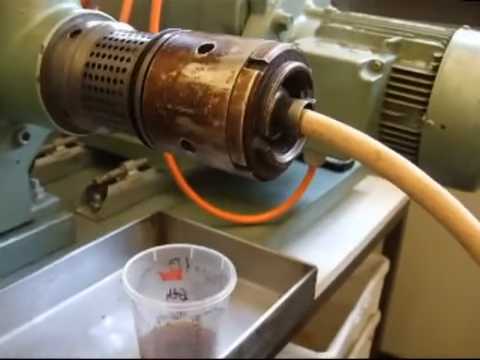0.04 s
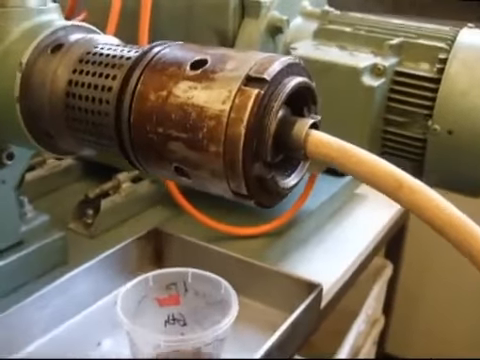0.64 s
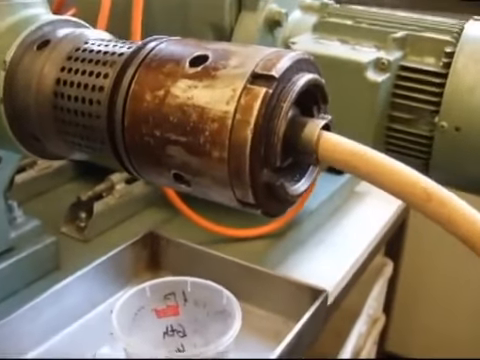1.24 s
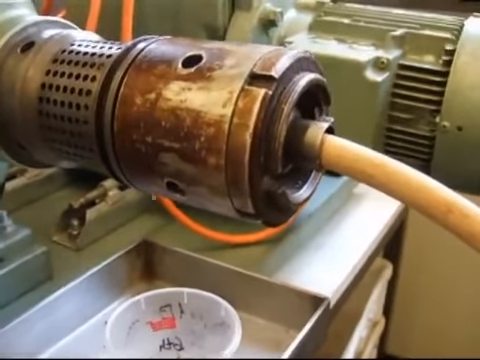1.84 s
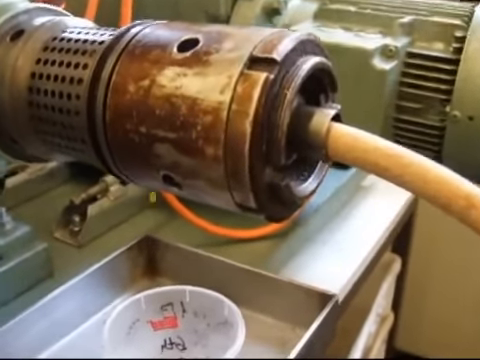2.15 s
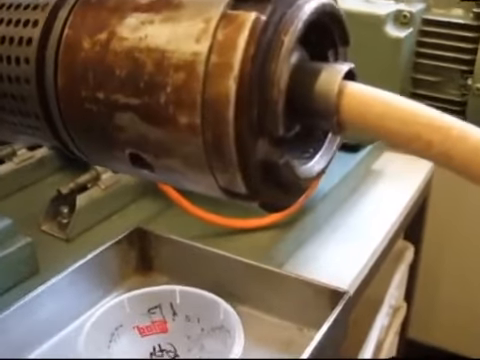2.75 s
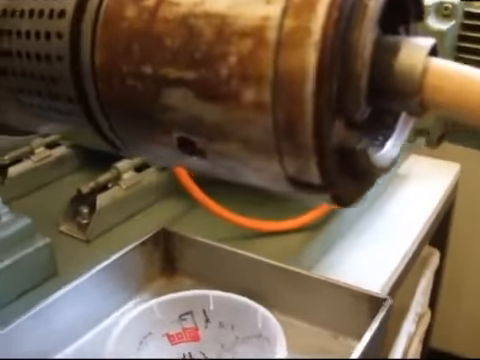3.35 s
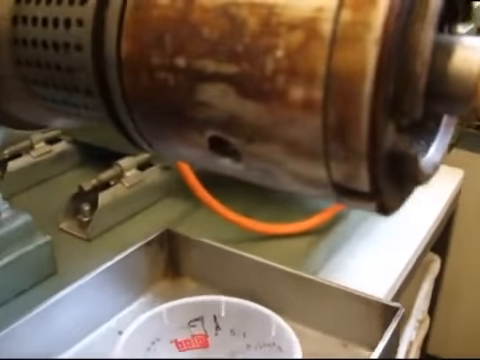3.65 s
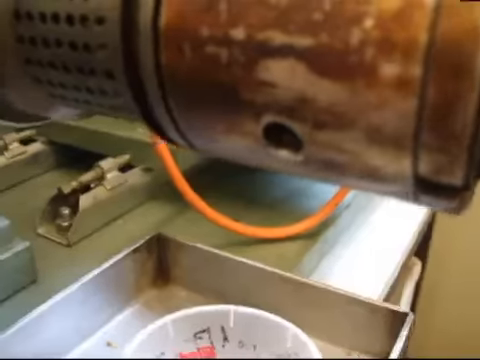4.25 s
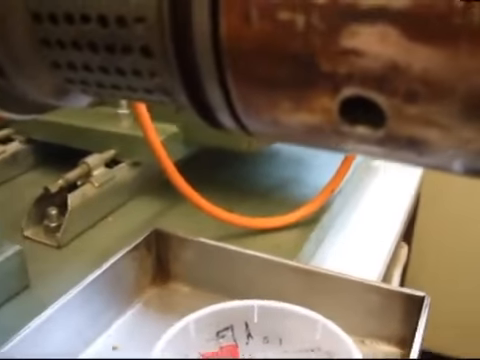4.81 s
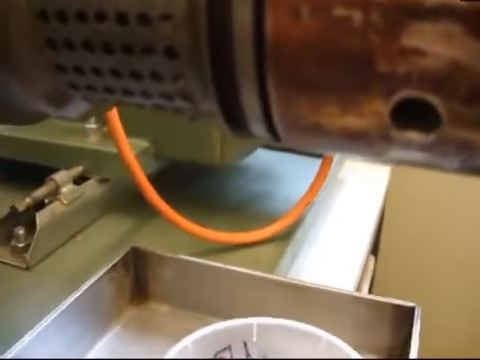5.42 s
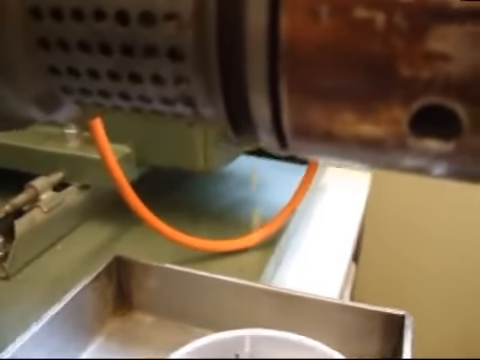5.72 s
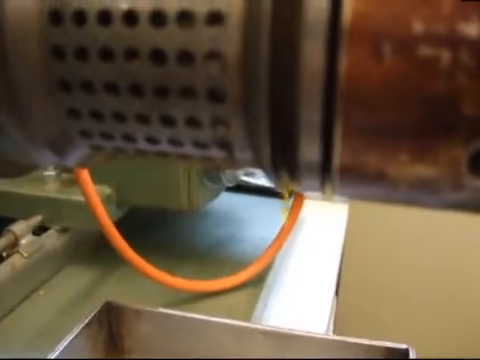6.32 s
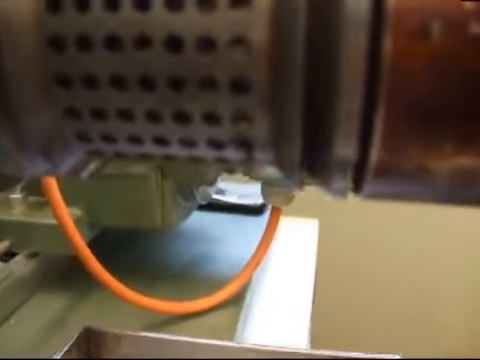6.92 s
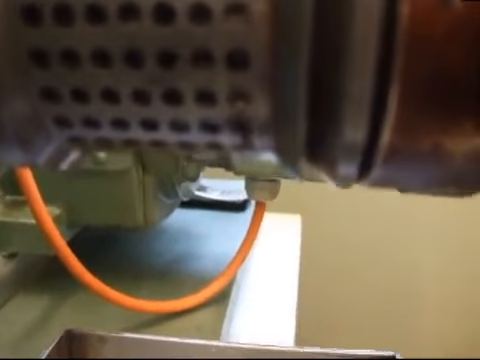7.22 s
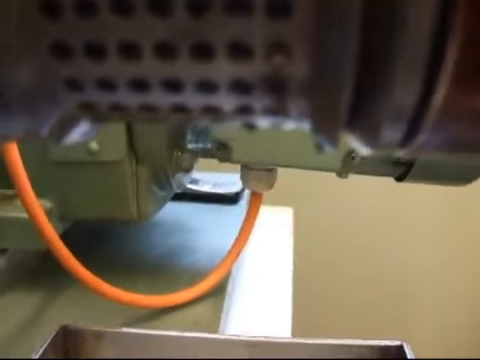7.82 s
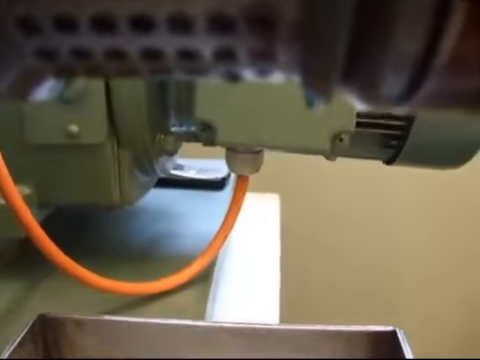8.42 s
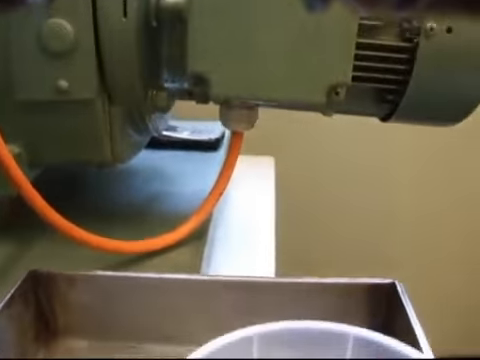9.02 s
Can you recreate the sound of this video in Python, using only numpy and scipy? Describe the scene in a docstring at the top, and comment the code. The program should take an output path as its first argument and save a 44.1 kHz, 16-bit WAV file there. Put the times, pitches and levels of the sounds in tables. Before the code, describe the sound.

An electric motor and gearbox drone steadily indoors, driving an oil press. A many-toned whine and the airy, slightly buzzing rush of a fan sit above the hum. The pitch holds throughout, while the sound gradually gets fuller and louder as the close microphone approaches. The metal press head ticks faintly around the middle and again near the end.

```python
"""A screw oil press runs steadily in a workshop while the microphone moves slowly towards its drive.
The induction motor hums and whines at its rotor-slot harmonics, the gearbox drones and rattles in its casing,
the cooling fan rushes and rings the motor housing, and the press head gives a few faint ticks."""
import sys
import numpy as np
from scipy import signal
from scipy.fft import rfft, irfft, next_fast_len
from scipy.io import wavfile

SR = 44100
rng = np.random.default_rng(int(sys.argv[2]) if len(sys.argv) > 2 else 0)


def put_to_file(sound):
    """Save the sound as 16-bit audio at rate SR, in the file named by the first command-line argument."""
    columns = np.atleast_2d(sound).T  # one column per channel
    safe = np.clip(columns, -1, 1)
    whole_steps = np.round(safe * 32767)
    wavfile.write(sys.argv[1], SR, whole_steps.astype(np.int16))


N = 403956

# steadier magnetic tones: (multiple of rotor speed, multiple of mains, dB at the start, rise dB)
MOTOR_TONES = [(0, 12, -39, 1), (42, 0, -50, -5), (52, 0, -47.5, -6), (55, 0, -62, 12), (73, 0, -53, 1), (80, 0, -54.5, 9),   # fixed
               (84, 0, -56, 5), (94, 0, -64, 9), (107, 0, -61, 4), (109, 0, -62, 6), (112, -2, -59, 7), (112, 0, -58, 8),   # fixed
               (133, 0, -54, -1), (137, 0, -55, 0), (140, -2, -55, 0), (147, 2, -55, 0), (148, 0, -58, 5),   # fixed
               (154, 0, -59, 6), (168, -2, -57, -6), (168, 2, -59, -5), (189, 0, -65, 14), (196, 4, -57, 0),   # fixed
               (203, 0, -60, 0), (224, 2, -58, 1), (251, 0, -57, 1), (284, 0, -59, 2), (308, -2, -62, 2), (308, 0, -63, 6)]   # fixed
# shaft tones: (multiple of rotor speed, dB)
SHAFT = [(6, -50.5), (7, -51.5), (11, -58), (16, -52.5), (17, -46.5), (18, -43), (25, -51.5), (27, -54.5), (30, -47.5), (44, -56.5)]
# gear drone: (multiple of gear rate, dB)
GEAR = [(7, -51.5), (8, -51), (9, -63.5), (12, -53), (14, -48.5), (15, -33.5), (16, -35.5), (17, -45.5), (18, -55), (20, -36.5), (21, -41.5),
        (22, -34.5), (23, -39), (24, -47.5), (25, -46), (26, -45.5), (27, -45), (28, -39.5), (29, -48.5), (30, -44), (31, -49.5)]
# further steady tones of the drive: (Hz, dB)
DRIVE_TONES = [(489.5, -48.5), (657.2, -47), (706.7, -47), (850.5, -43)]   # fixed
# the gear tones barely waver: (spread dB)
GEAR_WAVER_DB = 1.4   # fixed
# strength of the once-a-revolution buzz against the random air noise
WHIRR_BUZZ, HISS_BUZZ = 0.42, 0.56   # fixed
# bearing tones: (multiple of ball-pass rate, dB)
BEARING = [(2, -40), (3, -43)]
# hum: (multiple of mains, dB)
HUM = [(2, -37.5), (6, -1.0)]
# gearbox casing: (Hz, width Hz, dB)
CASING = [(299, 41, -0.5), (376, 76, -2.5), (457, 69, -6.5), (675.3, 65, 3.0), (741, 17, -6.5), (891.6, 77, 2), (1030.5, 27, -9.5)]
# fan rush and high hiss: (Hz, dB per Hz)
FAN = [(200, -21.5), (600, -7.5), (1000, 0), (1130, 0), (1350, -1.5), (1600, -11), (3000, -32)]
HISS = [(3000, -24.5), (4600, -2.5), (5400, -0.5), (5850, -1.5), (6500, -2), (7500, 0.5), (7900, -23)]
# ringing of the motor housing: (Hz, width Hz, loudest at s, heard for s either side, dB)
HOUSING = [(1056, 70, 8.9, 1.3, -42), (1276, 220, 4.4, 0.72, -43), (1530, 200, 1.4, 1.9, -46.5), (1819, 110, 2.8, 1.3, -44.5),
           (2524, 110, 2.3, 2.2, -51), (2740, 130, 7.7, 1.2, -51), (3270, 90, 4.55, 0.44, -44.5)]
# ticks at the press head: (s, bright ring dB, dull crack dB)
TICKS = [(4.679, -31, -28), (5.413, -30, -31), (5.691, -31, -40), (8.651, -36, -24.5), (8.728, -22, -40)]   # fixed
# the dull crack: (Hz, dB per Hz)
CRACK = [(900, -12), (1500, -2), (2100, 0), (2700, -5), (4000, -13), (7500, -22)]   # fixed
# press head: (Hz, dB, t60 s)
HEAD = [(2900, -12, .012), (5300, -13, .012), (6750, -12, .01), (7100, -2, .012), (7400, -3, .025)]   # fixed
CUTOFF_HZ = 7650   # fixed
TIME = np.arange(N) / SR
SLOTS = 28   # fixed
ROTOR_HZ, GEAR_HZ, MAINS_HZ, BEARING_HZ = 24.677, 30.99, 49.96, 147.05   # fixed
# broad noises of the drive: (Hz, dB per Hz)
RUMBLE = [(20, 0), (40, -11.5), (70, -12.5), (100, -8), (160, -2.5), (230, -4), (330, 4.5), (560, -3), (900, -20), (2000, -42)]
WHIRR = [(900, -12), (1500, 1.5), (1850, 2), (2150, -1), (2700, -0.5), (3000, -4), (3700, -1.5), (4100, -3.5), (4700, -10.5), (6500, -21.5)]
# bed, motor frame and low, middle and high casing panels; each swells as the microphone comes round to it:
# (Hz where it radiates most, swell from s, swell until s, rise dB)
PANELS = [(180, -2, 5.5, 4), (320, 1.5, 8.2, 10), (450, -1.5, 7.5, 4.5), (640, -2, 4, 10), (865, 4.5, 5.5, 2.5)]
# steady sounds gain evenly over the approach: (dB at the start, rise dB)
RUMBLE_LEVEL = (-40.5, 5)
WHIRR_LEVEL = (-37.5, 1.92)
HISS_LEVEL = (-43.5, 1.3)
# level of the hum, which rises steadily over the approach: (s, dB)
HUM_LEVEL = [(0.0, -39.5), (3.0, -33.5), (6.2, -26.5), (9.14, -22.5)]
# level of the fan's rush: (s, dB)
RUSH_LEVEL = [(0.3, -40.5), (2.27, -40.5), (4.64, -39), (5.44, -40), (9.05, -39.5)]
# standing waves make each tone swell and fade: (spread dB per kHz of pitch, swings per s)
STANDING_DB, STANDING_PER_S = 2, 0.94
# the moving microphone shifts the phase of each tone: (spread radians per kHz of pitch, swings per s)
PATH_RAD_PER_KHZ, PATH_PER_S = 0.15, 0.3   # fixed
# level of the numbered slot harmonics and their strongest neighbours along the path through the room's standing waves: (s, dB)
WHINE_1 = [(0.0, -39), (3.27, -31), (9.14, -37)]
WHINE_1_UPPER = [(0.0, -37.5), (1.43, -43), (2.2, -39), (2.78, -32.5), (3.8, -33.5), (4.57, -42),
                 (5.76, -34.5), (7.55, -29.5), (9.14, -29)]
WHINE_1_TOP = [(0.0, -46), (1.31, -38.5), (2.12, -35), (2.78, -46), (4.37, -43.5), (5.63, -31),
               (9.14, -30.5)]
WHINE_5_FLUTTER = [(0.0, -48), (2.45, -56), (2.7, -42), (3.05, -48), (3.35, -55), (3.59, -32.5), (4.12, -42.5), (4.65, -38.5),
                   (5.3, -44.5), (5.8, -53), (7.5, -46), (9.14, -50)]
WHINE_5_UPPER = [(0.0, -48), (1.1, -39.5), (2.29, -48.5), (2.65, -38.5), (3.92, -50.5), (4.9, -37.5),
                 (5.51, -60), (6.73, -43), (8.16, -37.5), (9.14, -45)]
WHINE_5_TOP = [(0.0, -50), (0.33, -42), (1.59, -47), (2.04, -42), (4.69, -41), (5.51, -44.5),
               (6.73, -42.5), (7.1, -46), (9.14, -36.5)]
WHINE_6 = [(0.0, -55), (0.33, -43), (0.65, -53), (1.92, -44.5), (2.45, -51.5), (2.86, -45), (3.8, -52),
           (6.57, -48.0), (7.43, -39), (9.14, -42)]
WHINE_8_LOWER = [(0.0, -48), (0.49, -57), (0.94, -47), (1.59, -56), (3.76, -45.5), (3.88, -53),
                 (5.59, -53), (6.2, -46), (6.9, -58), (9.14, -58)]
WHINE_9_LOWER = [(0.0, -44), (2.08, -43), (2.24, -44), (3.39, -41.5), (4.12, -56), (6.04, -46.5),
                 (7.02, -54), (7.59, -51.5), (9.14, -50.5)]
WHINE_9_UPPER = [(0.0, -54), (1.5, -46), (2.35, -58), (3.3, -43), (4.2, -44.5), (4.7, -57), (5.8, -46), (6.7, -56.5), (9.14, -52)]
WHINE_5 = [(0.0, -34.5), (0.33, -33), (0.73, -43.5), (1.18, -35.5), (2.12, -35.5), (2.37, -41), (2.65, -32.5),
           (3.02, -41), (3.71, -31), (5.51, -39), (5.76, -45), (6.24, -37.0), (7.14, -36), (7.84, -41.5),
           (8.37, -56), (8.94, -41), (9.14, -44)]
WHINE_7 = [(0.0, -50), (0.41, -36), (1.14, -41.5), (1.39, -52), (1.8, -45), (2.29, -39.5), (3.88, -38.5),
           (4.49, -45), (4.73, -42), (6.86, -58), (7.22, -39.5), (9.14, -35)]
WHINE_7_LOWER = [(0.0, -60), (1.9, -48), (3.3, -56), (5.0, -51), (6.3, -55), (6.9, -45), (7.6, -51.5), (9.14, -48)]
WHINE_8 = [(0.0, -45), (1.14, -47.5), (1.67, -63), (3.35, -47.5), (4.53, -48), (4.69, -54), (5.31, -46),
           (5.76, -59), (6.04, -43), (6.61, -59), (7.8, -49), (9.14, -44.5)]
WHINE_9 = [(0.0, -47), (0.45, -47), (0.61, -53.5), (1.14, -53), (1.92, -40.5), (2.69, -39), (2.78, -54),
           (3.27, -38.5), (3.8, -46), (4.49, -46), (4.82, -37.5), (5.96, -38.5), (7.02, -50), (7.63, -39.5),
           (7.88, -47.5), (8.41, -40), (8.65, -47), (9.14, -41.5)]
# harmonics of the 28 rotor slots: (multiple of rotor speed, multiple of mains, depth of the once-a-revolution throb 0-1, level curve)
SLOT_HARMONICS = [(28, 0, 0, WHINE_1), (28, 2, 0, WHINE_1_UPPER), (28, 4, 0, WHINE_1_TOP), (140, 0, 0, WHINE_5),   # fixed
                  (141, 0, 0, WHINE_5_FLUTTER), (140, 2, .27, WHINE_5_UPPER), (147, 0, .24, WHINE_5_TOP),   # fixed
                  (168, 0, .1, WHINE_6), (196, 0, .14, WHINE_7), (224, 0, .15, WHINE_8), (224, -2, .15, WHINE_8_LOWER),   # fixed
                  (252, 0, .15, WHINE_9), (252, -2, .1, WHINE_9_LOWER), (252, 2, .1, WHINE_9_UPPER),   # fixed
                  (196, -2, .1, WHINE_7_LOWER)]   # fixed
# weaker slot tones, which each swell or sink once on the way in:
# (multiple of rotor speed, multiple of mains, throb depth 0-1, dB before, change from s, change until s, change dB)
SIDE_TONES = [(28, -2, 0, -41.5, 1, 4, 4), (28, 6, 0, -38.5, 5, 7.5, -5), (29, 4, 0, -43, 3.5, 6.5, 10),   # fixed
              (27, 4, 0, -39, 5, 7, 5.5), (139, 0, 0, -48.5, 3.5, 8, -6), (139, 2, 0, -55, 1, 3, 5), (142, 0, 0, -60, 1, 3, 4),   # fixed
              (196, 2, .1, -52, 3, 8, -4)]   # fixed
# quick unsteadiness of the whine: (spread dB, swings per s)
FLUTTER_DB, FLUTTER_PER_S = 0.84, 2.9


def from_db(db):
    """Decibels to gain."""
    return np.exp(np.asarray(db) * np.log(10) / 20)


def rms_one(x):
    """Scale to unit power."""
    return x / np.sqrt(np.mean(x ** 2) + 1e-20)


def in_time(rows):
    """Each column of a curve, sample by sample."""
    s, *columns = np.transpose(rows)
    return [np.interp(TIME, s, c) for c in columns]


def drift(rate):
    """Slow chance of spread 1: noise through a double one-pole low-pass, run in."""
    r = np.exp(-200 * np.pi * rate / SR)  # fixed
    slow = signal.lfilter([1], [1, -2 * r, r * r], rng.standard_normal(N // 100 + 2002))[2000:]  # fixed
    return np.interp(np.arange(N) / 100, np.arange(len(slow)), rms_one(slow))  # fixed


def turning(hz, wander, rate):
    """Angle of a shaft whose speed wanders by a small share."""
    return 2 * np.pi * hz * np.cumsum(1 + wander * drift(rate)) / SR


def tone(angle, fade_db, fade_rate):
    """A partial of rms 1 whose level wavers slowly."""
    return rms_one(np.sin(angle + rng.uniform(0, 2 * np.pi)) * from_db(fade_db * drift(fade_rate)))


def orders(rows, hz, angle, panels, fade_db, fade_rate):
    """Whole multiples of one rotation, heard through the casing."""
    return sum(from_db(db) * radiated(k * hz, panels) * tone(round(k) * angle, fade_db, fade_rate) for k, db in rows)




def coloured(x, spectrum):
    """Give a sound a smooth spectrum; rms 1."""
    hz, db = np.transpose(spectrum)
    size = next_fast_len(N)
    bins = np.maximum(np.arange(size // 2 + 1) * SR / size, 1)
    gain = from_db(np.interp(np.log(bins), np.log(hz), db)) * (bins < SR / 5)  # fixed
    return rms_one(irfft(rfft(x, size) * gain, size)[:N])


def resonate(x, hz, width):
    """A resonance with gain 1 on top."""
    r = np.exp(-np.pi * width / SR)
    return signal.lfilter(np.array([1, 0, -1]) * (1 - r * r) / 2, [1, -2 * r * np.cos(2 * np.pi * hz / SR), r * r], x)


def motor(rotor, mains):
    """Mains hum, and slots passing the stator field: rotor multiples shifted by multiples of the mains."""
    hum = from_db(in_time(HUM_LEVEL)[0]) * sum(from_db(db) * tone(round(m) * mains, fade_db=1.0, fade_rate=2.0) for m, db in HUM)
    steady = sum(approach(db, rise_db) * tone(k * rotor + m * mains, fade_db=0.9, fade_rate=0.94) for k, m, db, rise_db in MOTOR_TONES)
    return hum + steady


def whine(rotor, mains):
    """Strong slot tones, and side tones that beat against them into a throb, each family at its own point of the mains cycle."""
    offsets = rng.uniform(0, 2 * np.pi, size=10)

    def angle(k, m):
        """Tones of one slot family keep in step, but the changing path shifts short waves."""
        return k * rotor + m * (mains + offsets[round(k / SLOTS)]) + PATH_RAD_PER_KHZ * k * ROTOR_HZ / 1000 * drift(PATH_PER_S)

    strong = sum(from_db(in_time(level)[0]) * slot_tone(angle(k, m), rotor, throb) for k, m, throb, level in SLOT_HARMONICS)
    sides = sum(from_db(db) * swell(start, end, change_db) * standing_waves(k * ROTOR_HZ) * slot_tone(angle(k, m), rotor, throb)
                for k, m, throb, db, start, end, change_db in SIDE_TONES)
    return strong + sides


def gearbox(rotor, panels):
    """Gear, shaft and bearing tones, and a burst of rattle into the casing at each tooth."""
    gear = turning(GEAR_HZ, wander=0.00072, rate=3.29)
    balls = turning(BEARING_HZ, wander=0.00054, rate=1.1)
    drone = orders(GEAR, GEAR_HZ, gear, panels, fade_db=GEAR_WAVER_DB, fade_rate=3.4)
    drone += sum(from_db(db) * radiated(hz, panels) * tone(hz / GEAR_HZ * gear, GEAR_WAVER_DB, fade_rate=2) for hz, db in DRIVE_TONES)
    drone += orders(SHAFT, ROTOR_HZ, rotor, panels, fade_db=1.5, fade_rate=1.3)
    drone += orders(BEARING, BEARING_HZ, balls, panels, fade_db=3.0, fade_rate=3.4)
    since_tooth = gear / (2 * np.pi) % 1 / GEAR_HZ
    rattle = rng.standard_normal(N) * (0.22 + np.exp(-since_tooth / 0.0083))
    rattle *= from_db(0.47 * drift(25))   # the load on the screw is lumpy, so some teeth strike harder
    casing = sum(from_db(db) * radiated(hz, panels) * rms_one(resonate(resonate(rattle, hz, width), hz, width))
                 for hz, width, db in CASING)
    return drone + from_db(-30.5) * rms_one(casing)


def fan(rotor):
    """Rushing air, plus a buzz from the same roughness met on every revolution and pulled by the field."""
    size = int(SR / ROTOR_HZ)
    roughness = np.interp(rotor / (2 * np.pi) * size, np.arange(size), rng.standard_normal(size), period=size)
    pull = np.cos(4 * np.pi * MAINS_HZ * TIME)  # fixed
    buzz = rms_one(roughness * (1 + 0.24 * pull))
    rumble = approach(*RUMBLE_LEVEL) * coloured(rng.standard_normal(N), RUMBLE)
    rush = from_db(in_time(RUSH_LEVEL)[0] + 2.5) * coloured(rng.standard_normal(N) + 0.39 * buzz, FAN)
    whirr = approach(*WHIRR_LEVEL) * coloured(rng.standard_normal(N) + WHIRR_BUZZ * buzz, WHIRR)
    hiss = approach(*HISS_LEVEL) * coloured(rng.standard_normal(N) * (1 + 0.1 * pull) + HISS_BUZZ * buzz, HISS)
    return rumble + rush + whirr + hiss + housing(buzz)


def ticks():
    """Each tick is a short dull crack that rings the steel press head."""
    clicks, cracks = np.zeros(N), np.zeros(N)
    for s, ring_db, crack_db in TICKS:
        clicks[round(s * SR)] = from_db(ring_db)
        cracks[round(s * SR)] = from_db(crack_db)
    dying = signal.lfilter([1], [1, -np.exp(-1 / (0.0076 * SR))], cracks + 1e-18)  # fixed
    out = dying * coloured(rng.standard_normal(N), CRACK)
    for hz, db, t60 in HEAD:
        r, w = from_db(-60 / (t60 * SR)), 2 * np.pi * hz / SR  # fixed
        out = out + from_db(db) * signal.lfilter([0, np.sin(w)], [1, -2 * r * np.cos(w), r * r], clicks + 1e-18)
    return out


def radiated(hz, panels):
    """Gain of one frequency, shared between the nearest casing panels."""
    shares = [np.interp(hz, [panel[0] for panel in PANELS], row) for row in np.eye(len(panels))]
    return np.dot(shares, panels)


def approach(start_db, rise_db):
    """Gain of a sound that the microphone nears at an even pace."""
    return from_db(start_db + rise_db * TIME / TIME[-1])


def swell(start, end, rise_db):
    """Gain that holds, rises evenly and holds again."""
    return from_db(rise_db * np.clip((TIME - start) / (end - start), 0, 1))


def standing_waves(hz):
    """Slowly wandering gain of one tone at the moving microphone; short waves swing most."""
    return rms_one(from_db(STANDING_DB * hz / 1000 * drift(STANDING_PER_S)))




def slot_tone(angle, rotor, throb):
    """One tone of the whine, locked to the rotor; the uneven air gap throbs it once a revolution; rms 1."""
    return rms_one(np.sin(angle) * (1 + throb * np.cos(rotor)) * from_db(FLUTTER_DB * drift(FLUTTER_PER_S)))




def housing(buzz):
    """Air and buzz ring the motor housing; each resonance stands out while the microphone passes its lobe."""
    return sum(from_db(db) * np.exp(-((TIME - s) / reach) ** 2)
               * rms_one(resonate(resonate(rng.standard_normal(N) + WHIRR_BUZZ * buzz, hz, width), hz, width))
               for hz, width, s, reach, db in HOUSING)


def scene():
    """One rotor drives everything; the casing grows louder as the microphone nears it."""
    rotor = turning(ROTOR_HZ, wander=0.000203, rate=0.77)
    mains = 2 * np.pi * MAINS_HZ * TIME
    panels = np.array([rms_one(swell(start, end, rise_db)) for _, start, end, rise_db in PANELS])
    drive = motor(rotor, mains) + whine(rotor, mains) + gearbox(rotor, panels) + fan(rotor)
    return (drive + ticks())[None]


def record(dry):
    """The top is cut steeply."""
    return signal.sosfilt(signal.ellip(12, .1, 90, CUTOFF_HZ, fs=SR, output="sos"), dry)  # fixed


dry = scene()
out = record(dry)
put_to_file(out)
```